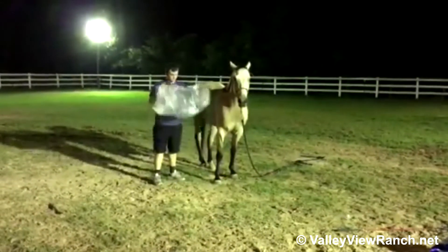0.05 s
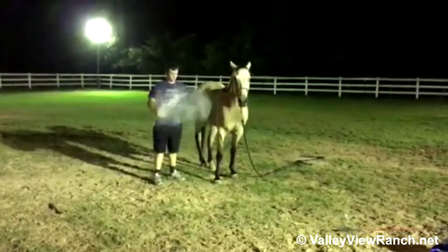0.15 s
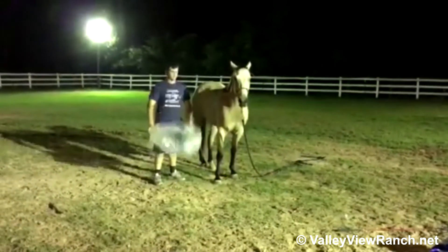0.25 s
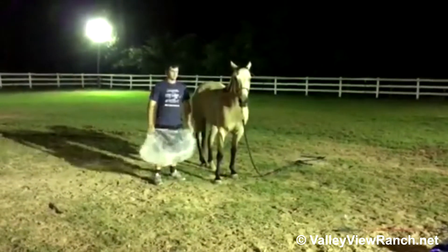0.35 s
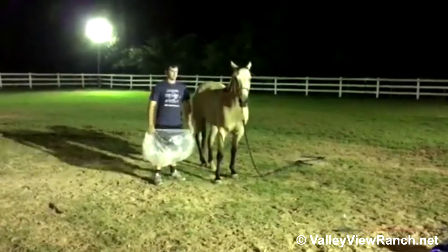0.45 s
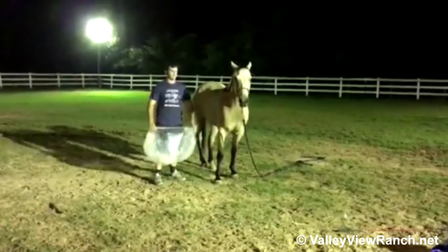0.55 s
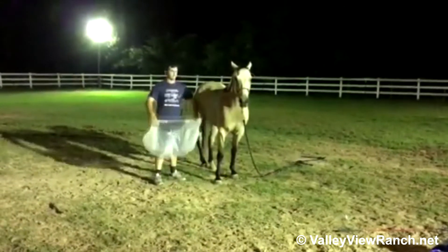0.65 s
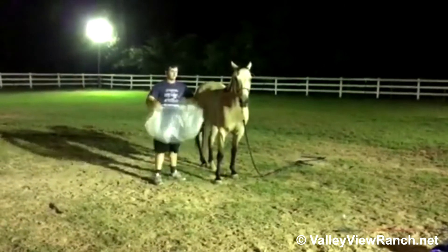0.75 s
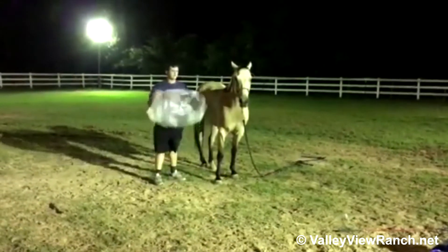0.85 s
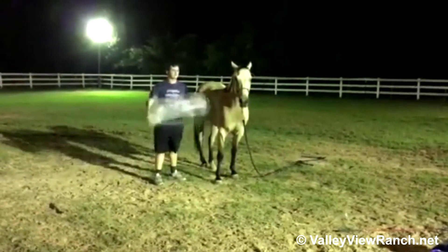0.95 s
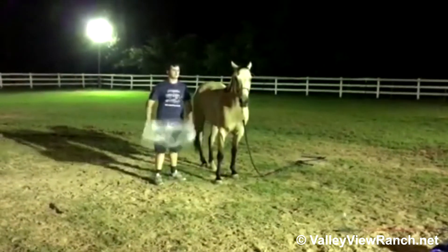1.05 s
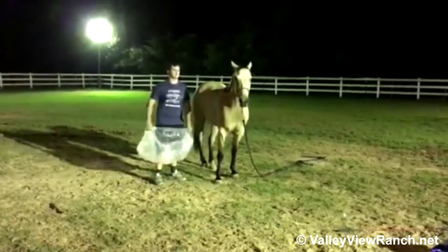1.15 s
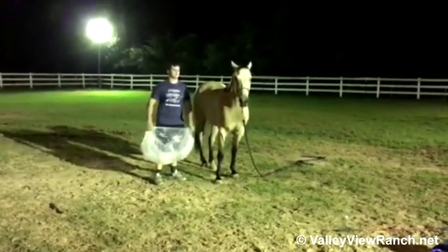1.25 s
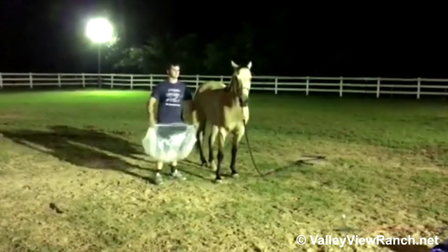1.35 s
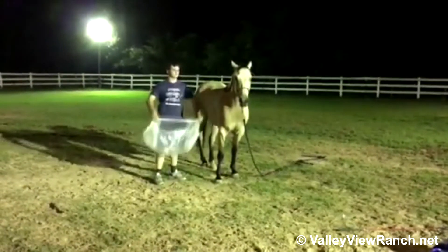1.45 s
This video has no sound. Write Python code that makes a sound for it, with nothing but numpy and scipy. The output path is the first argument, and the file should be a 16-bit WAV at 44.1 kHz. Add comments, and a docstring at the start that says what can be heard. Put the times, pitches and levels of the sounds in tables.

```python
"""Night air in an open field: a low rumble, far insects in throbbing noise bands, a faint restless rustle.
A large plastic bag folds softly, then is swung down at about a quarter of a second: a rush of buckling
creases and ringing panels, air buffeting the film, and bright snaps with puffs of air as it pulls taut.
It rustles with soft folds and lone ticks while it is lifted again, comes down once more just after one
second, and crumples away in a last rustle."""
import sys
import numpy as np
from scipy import signal
from scipy.fft import rfft, irfft
from scipy.io import wavfile

SR = 44100
rng = np.random.default_rng(int(sys.argv[2]) if len(sys.argv) > 2 else 0)


def wrap_up_sound(samples):
    """Save the sound to the file named by the first command line argument, as 16-bit audio."""
    columns = np.atleast_2d(samples).T
    # keep every value between -1 and 1, then stretch to whole-number steps
    tamed = np.clip(columns, -1, 1)
    steps = np.round(tamed * 32767).astype(np.int16)
    wavfile.write(sys.argv[1], SR, steps)


N = 66150
T = np.arange(N) / SR

# Spectra of each layer: (frequency [Hz], relative density [dB]); only the shape counts
# night rumble and air
NIGHT_SPECTRUM = [(20, -42), (42, -10.5), (60, 0), (80, 5), (120, -3.5), (190, -15.5), (400, -24),
                  (700, -14.5), (1300, -27), (2600, -19), (4500, -27), (8000, -34.5), (15000, -43)]
# creases of the slack film
SLACK_SPECTRUM = [(80, -3), (160, 4), (270, 4.5), (480, -9.5), (900, 0), (1600, 1.5), (2600, -6.5),
                  (4000, -7), (7000, -12), (10000, -19), (15000, -24)]
# creases of the film rushing down
TAUT_SPECTRUM = [(100, -23), (200, -6.5), (400, 0), (700, 0), (1250, -1.5), (2200, -4.5), (4000, -8),
                 (6000, -13), (9000, -17.5), (11000, -22), (15000, -27)]
# air buffeting the film
AIR_SPECTRUM = [(20, -56), (50, -24.5), (90, 7.5), (180, -2.5), (260, -11.5), (420, -16.5), (800, -29),
                (3000, -60)]
# bright creases of a snap
CRACK_SPECTRUM = [(100, -28), (400, -7.5), (1200, 6), (2200, -0.5), (4000, -4), (7000, -9), (10000, -12.5),
                  (15000, -21)]
# thin click of a lone crease
TICK_SPECTRUM = [(500, -13), (3000, 3), (6000, -1), (10000, -3), (13000, 2), (16000, -12)]

# Far insect choruses: (centre [Hz], bandwidth [Hz], level [dB])
INSECT_BANDS = [(3160, 500, -56), (6380, 980, -60.5), (9330, 1120, -60.5)]
# Soft folds of the slack film: (time [s], film level [dB], decay [s], puff level before trim [dB])
FOLDS = [(.158, -55.5, 0.006, -66), (0.311, -34, 0.019, -50), (0.404, -48, 0.0082, -50),
         (0.47, -31.5, 0.0057, -24), (0.559, -42, 0.021, -52), (0.639, -43.5, 0.012, -54),
         (0.751, -43.5, 0.0023, -64), (0.817, -47, 0.019, -71), (.915, -48.5, 0.016, -52),
         (.970, -45.5, 0.0073, -43), (1.178, -34, 0.006, -60), (1.251, -37, 0.0059, -46.5),
         (1.287, -41.5, 0.0062, -36), (1.309, -37.5, 0.0057, -47), (1.409, -51, .012, -47),
         (1.433, -50, 0.0066, -44.5)]
# The bag crumples and is lifted: (time of full level [s], hold [s], level [dB])
LIFTS = [(.29, 0.21, -39), (1.112, 0.2, -39.5)]
# Air rushes over the film on the way down:
# (time the bag fills [s], held full [s], crease level [dB], air buffeting level [dB])
STROKES = [(0.226, 0.016, -36.5, -54), (.254, 0.031, -23.5, -31), (1.064, .041, -22, -29.5)]
# The film pulls taut:
# (time [s], crack level [dB], crack decay [s], puff level before trim [dB], puff pitch [Hz])
SNAPS = [(0.2335, -36, .006, -31, 140), (0.2493, -25, 0.011, -15.5, 366), (0.2542, -41, .004, -14, 107),
         (0.2674, -15.5, 0.013, -26, 110), (0.275, -33, 0.0029, -16.5, 183), (0.2812, -23, 0.012, -21, 179),
         (1.039, -26, 0.0072, -31, 152), (1.058, -30, 0.0023, -27, 246),
         (1.0666, -17.5, 0.003, -11.5, 149.7), (1.0819, -24.5, 0.0039, -23.5, 157),
         (1.091, -26, 0.0073, -16, 103), (1.1053, -24, 0.019, -22.5, 121)]
# Single stiff creases: (time [s], level [dB])
TICKS = [(0.635, -41.5), (0.846, -45), (.881, -42), (1.116, -32), (1.268, -35)]

NIGHT_DB = -47.5
# throb: depth as a log-gain exponent, and how fast it may flutter
INSECT_THROB_DEPTH, INSECT_THROB_CUTOFF_HZ = 0.21, 65

LIFT_RISE_DB_PER_S, LIFT_FADE_DB_PER_S, IDLE_DB = 164, 216, -53.5
FOLD_RISE_S, FOLD_PUFF_HZ = 0.001, 278
SWELL_DB_PER_S, SLACKEN_DB_PER_S = 372, 521
AIR_SWELL_DB_PER_S, AIR_FADE_DB_PER_S = 449, 411
SNAP_RISE_S = 0.00047
TICK_RISE_S, TICK_DECAY_S = 0.00025, 0.0012

TAUT_CREASES_PER_S, SLACK_CREASES_PER_S, IDLE_CREASES_PER_S = 11000, 3500, 700
CREASE_SPREAD_DB = 2
SCATTER_DB, SCATTER_S = -7, 0.003  # smear against the clicks, and the decay time of its power
PANEL_RING_DB = -6  # against the creases
PANEL_CYCLES, PANEL_FLIPS_PER_S = 38, 60  # cycles to ring down by 60 dB; flips of each panel
PUFF_CYCLES, PUFF_TRIM_DB = 0.62, -2  # cycles until the puff's envelope peaks; trim on every puff
CUTOFF_HZ = 15150


def from_db(db):
    """Decibels to gain."""
    return 10 ** (np.asarray(db) / 20)


def rms_one(x):
    """Scale to unit power."""
    return x / np.sqrt(np.mean(x ** 2) + 1e-20)


def colour(x, spectrum):
    """Causal (minimum-phase) filter through the given points, with unit power gain."""
    size = 2 * N
    hz, db = np.transpose(spectrum)
    bins_hz = np.arange(N + 1) * SR / size
    gain = rms_one(from_db(np.interp(np.log(bins_hz + 1), np.log(hz), db)))
    # folding the cepstrum onto positive time gives the minimum phase
    cepstrum = irfft(np.log(gain))[:N]
    cepstrum[1:] *= 2
    response = np.exp(rfft(cepstrum, size))
    return irfft(rfft(x, size) * response)[:N]


def noise():
    """White noise."""
    return rng.standard_normal(N)


def swell(start, hold, rise, fall):
    """Rise up to start, hold, then fall; the slopes are in dB per second."""
    before = np.maximum(start - T, 0)
    after = np.maximum(T - start - hold, 0)
    return from_db(-rise * before - fall * after)


def burst(start, rise, decay):
    """Quick onset and exponential decay, height 1."""
    age = np.maximum(T - start, 0)
    shape = (1 - np.exp(-age / rise)) * np.exp(-age / decay)
    return shape / (shape.max() + 1e-12)


def night_air():
    """A steady low rumble of shaped noise with a faint airy top."""
    return from_db(NIGHT_DB) * rms_one(colour(noise(), NIGHT_SPECTRUM))


def insects():
    """Many far insects merge into narrow, throbbing bands."""
    out = 0
    for hz, width, db in INSECT_BANDS:
        edges = [hz - width / 2, hz + width / 2]
        band = signal.sosfilt(signal.butter(2, edges, "band", fs=SR, output="sos"), noise())
        flutter = signal.butter(2, INSECT_THROB_CUTOFF_HZ, fs=SR, output="sos")
        throb = rms_one(signal.sosfilt(flutter, noise()))
        out = out + from_db(db) * rms_one(band * np.exp(INSECT_THROB_DEPTH * throb))
    return out


def creases(per_s):
    """Random buckling clicks of uneven size, each smeared briefly by the film around it."""
    spread = CREASE_SPREAD_DB * np.minimum(rng.exponential(1, N), 4)
    sizes = from_db(spread) * rng.choice([-1, 1], N)
    clicks = sizes * (rng.random(N) < per_s / SR)
    # each click leaves a short tail of noise
    power = signal.lfilter([1], [1, -np.exp(-1 / (SCATTER_S * SR))], clicks ** 2 + 1e-18)
    scatter = rms_one(np.sqrt(power) * noise())
    return rms_one(rms_one(clicks) + from_db(SCATTER_DB) * scatter)


def panels():
    """Patches of film between the creases flip and ring briefly, each at a pitch of its own."""
    out = 0
    for hz in np.geomspace(350, 3500, num=22) * rng.uniform(0.88, 1.05, 22):
        flips = rng.standard_normal(N) * (rng.random(N) < PANEL_FLIPS_PER_S / SR)
        angle = 2 * np.pi * hz / SR
        radius = from_db(-60 * hz / (PANEL_CYCLES * SR))
        resonance = [1, -2 * radius * np.cos(angle), radius * radius]
        ring = signal.lfilter([1, 0, -1], resonance, flips + 1e-18)
        out = out + np.sqrt(hz) * rms_one(ring)
    return rms_one(out)


def puff(start, db, hz):
    """Jolted air in the bag swings for a cycle or two; pressure is the rate of change of its flow."""
    cycles = np.maximum(T - start, 0) * hz
    age = cycles / PUFF_CYCLES
    flow = from_db(db) * age * np.exp(1 - age) * np.cos(2 * np.pi * cycles)
    pressure = np.gradient(flow) * SR / (2 * np.pi * hz)
    return pressure * from_db(PUFF_TRIM_DB)


def rustle():
    """The slack bag crumples after each stroke, folds over and never quite rests."""
    lifts = sum(from_db(db) * swell(s, hold, LIFT_RISE_DB_PER_S, LIFT_FADE_DB_PER_S)
                for s, hold, db in LIFTS)
    folds = sum(from_db(db) * burst(s, FOLD_RISE_S, decay) for s, db, decay, _ in FOLDS)
    motion = np.hypot(lifts, folds)
    idle = from_db(IDLE_DB) * creases(IDLE_CREASES_PER_S)
    film = colour(motion * creases(SLACK_CREASES_PER_S) + idle, SLACK_SPECTRUM)
    ringing = motion * from_db(PANEL_RING_DB) * panels()
    puffs = sum(puff(s, db, FOLD_PUFF_HZ) for s, _, _, db in FOLDS)
    return film + ringing + puffs


def downstrokes():
    """A rush of creases and flipping panels, and air buffeting the film."""
    rush = sum(from_db(db) * swell(s, hold, SWELL_DB_PER_S, SLACKEN_DB_PER_S)
               for s, hold, db, _ in STROKES)
    air = sum(from_db(db) * swell(s, hold, AIR_SWELL_DB_PER_S, AIR_FADE_DB_PER_S)
              for s, hold, _, db in STROKES)
    film = colour(rush * creases(TAUT_CREASES_PER_S), TAUT_SPECTRUM)
    ringing = rush * from_db(PANEL_RING_DB) * panels()
    buffeting = colour(air * noise(), AIR_SPECTRUM)
    return film + ringing + buffeting


def snaps():
    """Each snap is a bright volley of creases on a puff of air."""
    volleys = sum(from_db(db) * burst(s, SNAP_RISE_S, decay) for s, db, decay, _, _ in SNAPS)
    cracks = colour(volleys * creases(TAUT_CREASES_PER_S), CRACK_SPECTRUM)
    puffs = sum(puff(s, db, hz) for s, _, _, db, hz in SNAPS)
    return cracks + puffs


def ticks():
    """Lone stiff creases flip with a thin click, a very short burst of noise."""
    clicks = sum(from_db(db) * burst(s, TICK_RISE_S, TICK_DECAY_S) for s, db in TICKS)
    return colour(noise() * clicks, TICK_SPECTRUM)


def scene():
    """The bag over the night air, in one channel."""
    field = night_air() + insects()
    bag = rustle() + downstrokes() + snaps() + ticks()
    return (field + bag)[None]


def record(dry):
    """The top is cut steeply."""
    return signal.sosfilt(signal.ellip(10, .1, 90, CUTOFF_HZ, fs=SR, output="sos"), dry)


dry = scene()
out = record(dry)
wrap_up_sound(out)
```